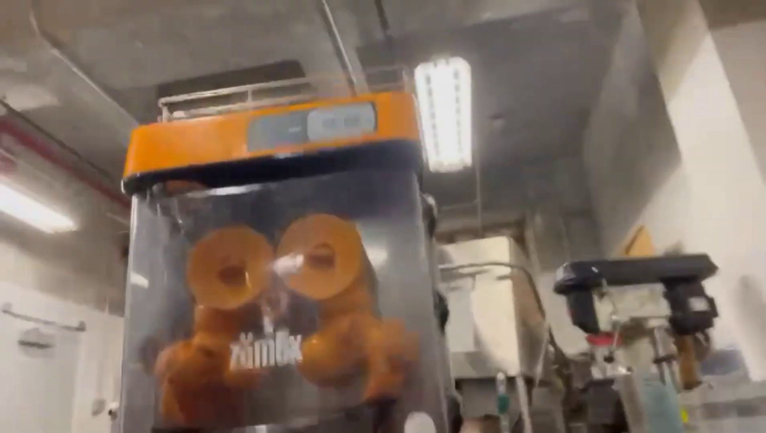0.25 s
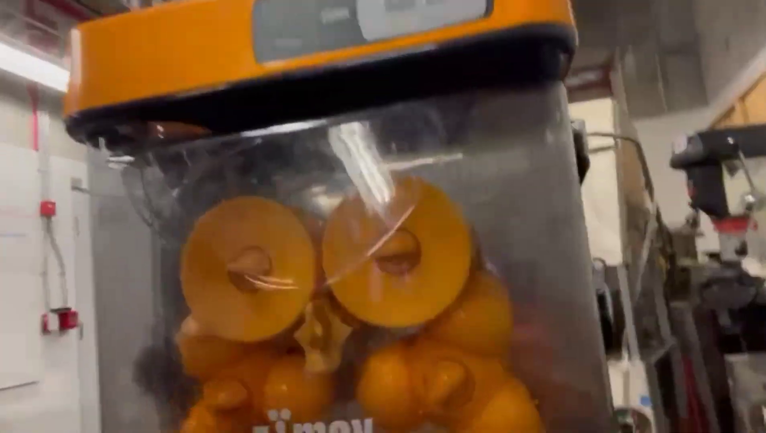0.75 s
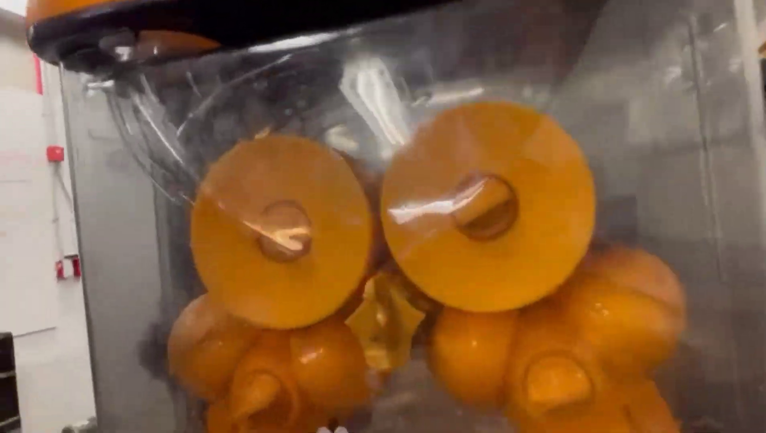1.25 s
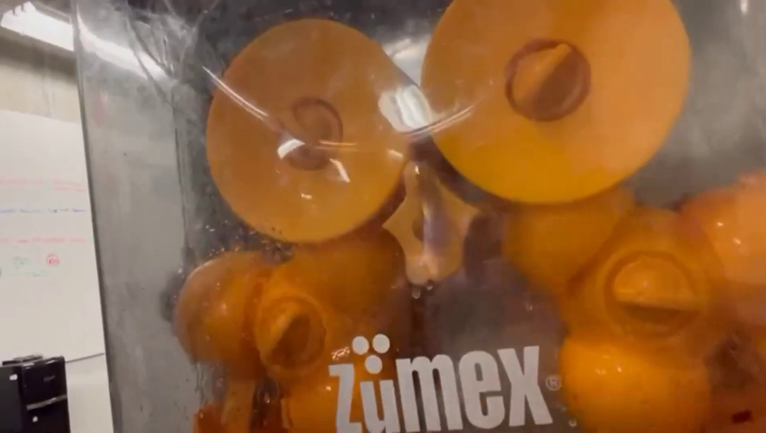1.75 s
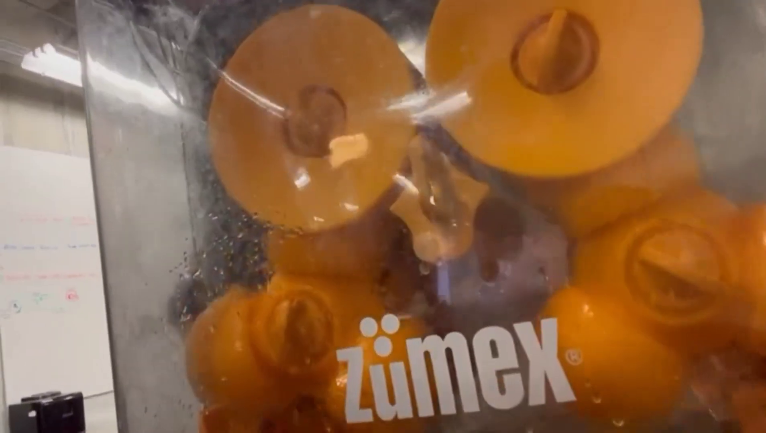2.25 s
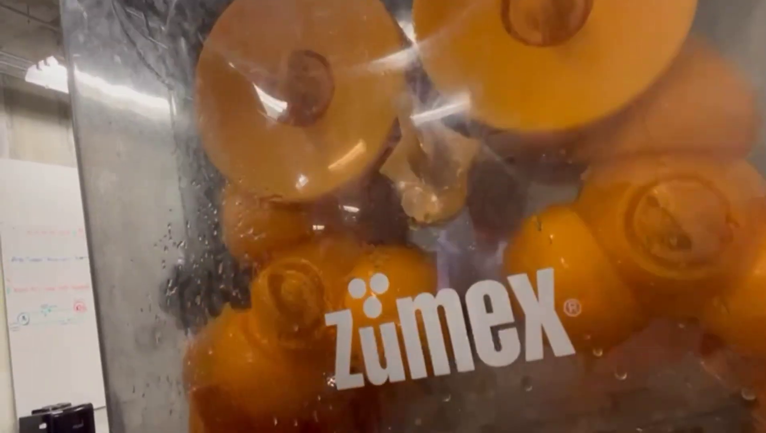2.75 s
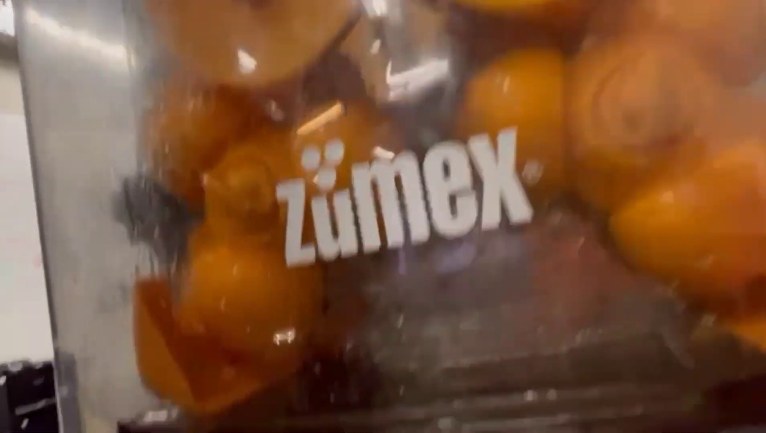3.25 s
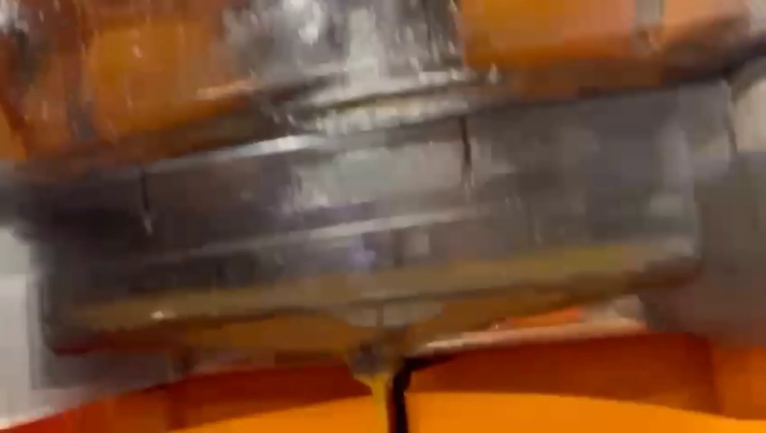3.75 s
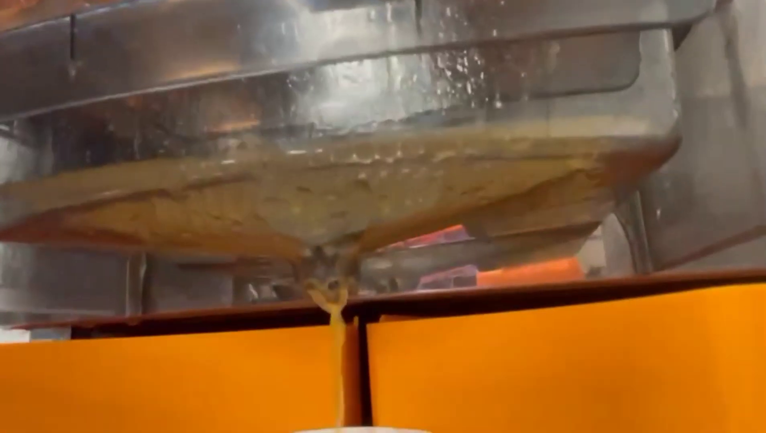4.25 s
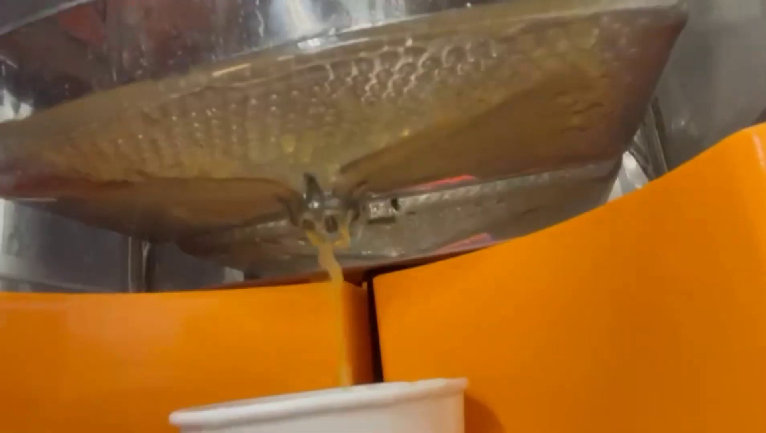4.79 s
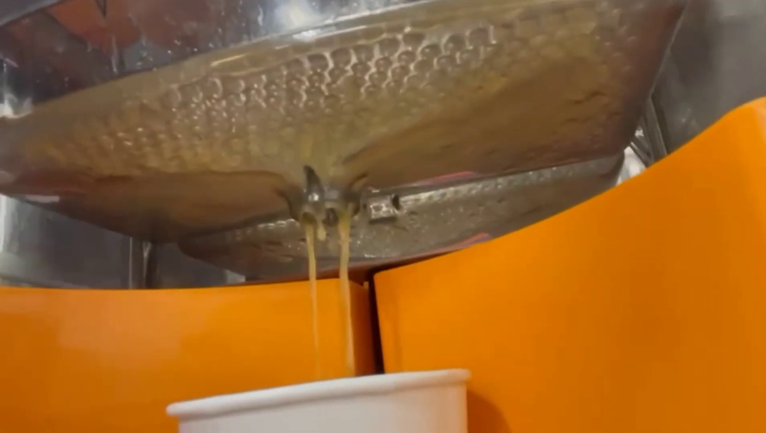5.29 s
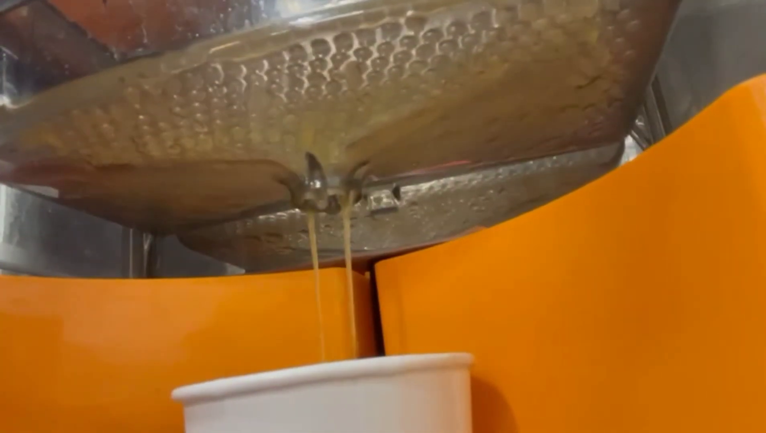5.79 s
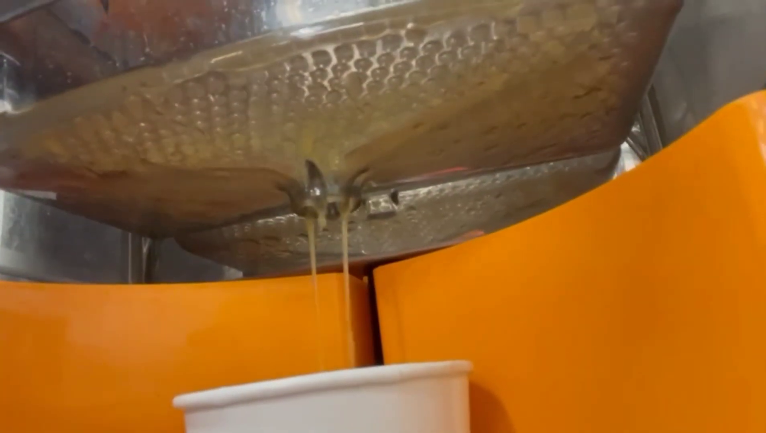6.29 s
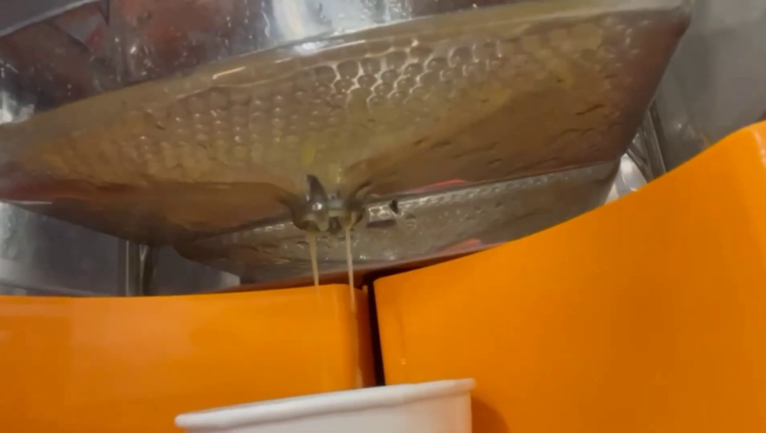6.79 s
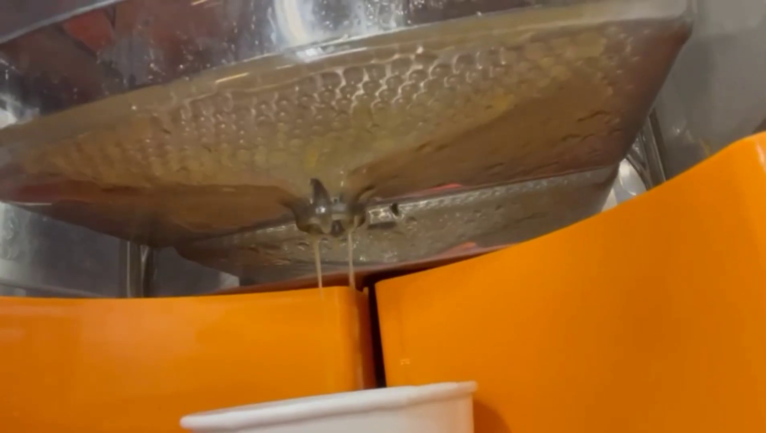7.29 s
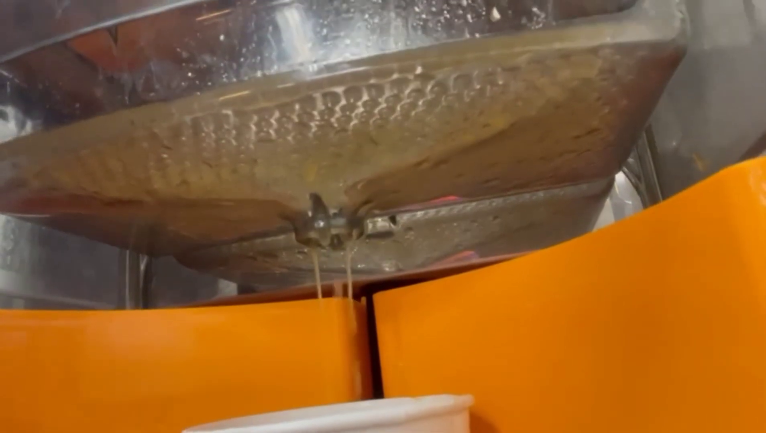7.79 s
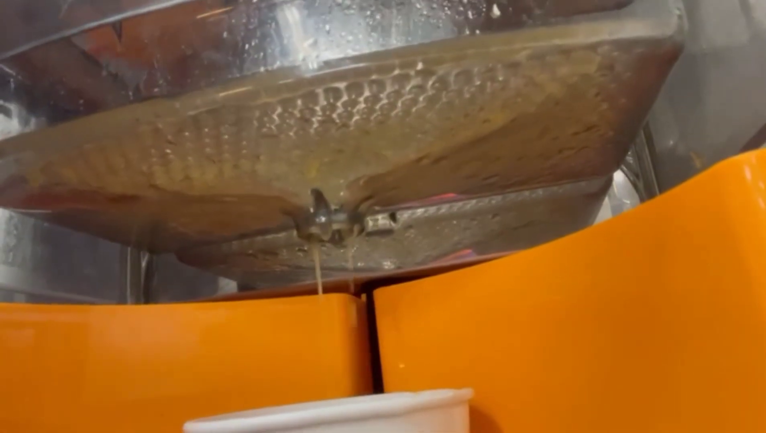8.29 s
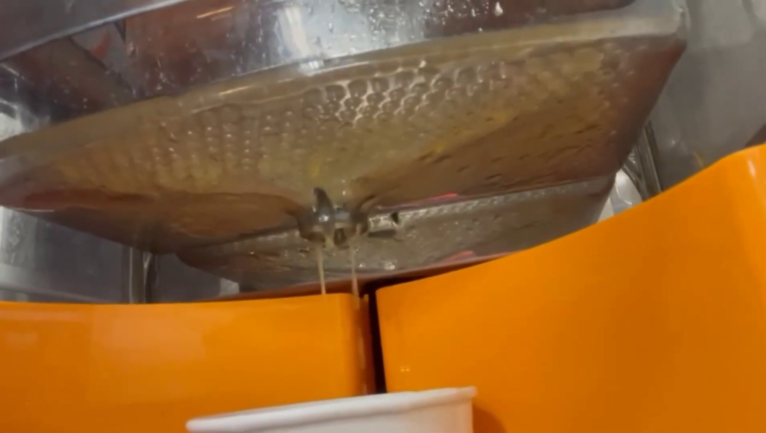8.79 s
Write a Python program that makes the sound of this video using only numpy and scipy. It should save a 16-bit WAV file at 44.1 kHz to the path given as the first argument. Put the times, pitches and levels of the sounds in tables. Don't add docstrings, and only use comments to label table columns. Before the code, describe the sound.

An automatic juicer runs without pause in a hard-walled workshop. A nearly pure low motor hum dominates, with steady gear tones, fluttering bearing whine, rumble and airy hiss around it. The handheld stereo microphone walks in, lingers close, then sinks lower, where the hum strengthens and the tone color shifts. Past the middle, a peel thuds hollowly into a bin, followed at once by a tiny high drip plink.

```python
import sys
import numpy as np
from scipy import signal
from scipy.fft import rfft, irfft, next_fast_len
from scipy.io import wavfile
from scipy.ndimage import uniform_filter1d, map_coordinates

SR = 44100
rng = np.random.default_rng(int(sys.argv[2]) if len(sys.argv) > 2 else 0)


def amp(db):
    return 10 ** (np.asarray(db, float) / 20)


def write(x):
    x = np.atleast_2d(x).T
    wavfile.write(sys.argv[1], SR, np.round(np.clip(x, -1, 1) * 32767).astype(np.int16))


N = 398663
LONG = next_fast_len(N + SR // 2)
KNOTS = 512
KNOT_S = np.arange(KNOTS) * LONG / SR / KNOTS
BALL_HZ, SHAFT_HZ = 319.39, 59.08


def unit(x):
    return x / np.sqrt(np.mean(np.abs(x) ** 2) + 1e-20)


def along(points, hz):
    f, v = np.transpose(points)
    return np.interp(np.log(hz + 1), np.log(f + 1), v)


def curves(rows, x):
    first, *cols = np.transpose(rows)
    return [np.interp(x, first, c) for c in cols]


def wobble(rate, t):
    return map_coordinates(rng.standard_normal(400), [t * rate])


def panned(x, pan_db):
    return x * amp(np.array([pan_db / 2, -pan_db / 2]))


def place(t):
    # t/s, place (0 afar, 1 striding, 2 arriving, 3 window, 4 sinking, 5 tray, 6 settled)
    way = [(0, 0), (.27, 0.1), (.4, 1), (.92, 1), (1.15, 2), (1.85, 2), (2.15, 3), (3.3, 3), (3.7, 4),
           (4.2, 4), (4.65, 5), (6.3, 5), (7.2, 6), (9.04, 6)]
    return curves(way, t)[0]


def nearness(k, t):
    return np.clip(1 - np.abs(place(t) - k), 0, 1)


def low_down(t):
    return np.clip((place(t) - 3) / 2, 0, 1)


def travelled(hz, heard):
    near = nearness(np.arange(len(heard))[:, None], KNOT_S)
    left_db, right_db, lead = np.transpose(heard, (2, 1, 0))
    return zip(hz, left_db @ near, right_db @ near, np.angle(np.exp(1j * lead) @ near))


def tones(table, gain, wander_db, rate, rough):
    t = KNOT_S
    spectrum = np.zeros((2, LONG // 2 + 1), complex)
    offsets = np.fft.fftfreq(KNOTS, 1 / KNOTS).astype(int)
    sooner_s = 0.7 * np.clip(t, 0.15, 0.65) / 343
    for hz, left_db, right_db, lead in table:
        flutter = rough * (wobble(17, t) + 1j * wobble(17, t))
        turns = rng.random() + hz * sooner_s
        common = gain(t) * (1 + flutter) * np.exp(2j * np.pi * turns + 0.5j * wobble(rate, t))
        for port, (db, turn) in enumerate([(left_db, lead), (right_db, 0)]):
            swell = amp(db + wander_db * wobble(rate, t)) * np.exp(1j * turn)
            line = np.fft.fft(common * swell) * LONG / KNOTS / np.sqrt(2)
            spectrum[port, round(hz * LONG / SR) + offsets] += line
    return irfft(spectrum, LONG)[:, :N]


def rush(mid, side, lean, band, patchy_db):
    z = signal.stft(rng.standard_normal((2, N + SR // 2)), nperseg=512)[2]
    field = uniform_filter1d(rng.standard_normal(z.shape[1:]), size=5, axis=0)
    field = uniform_filter1d(field, size=12, axis=1)
    pair = unit(signal.istft(z * amp(patchy_db * unit(field)), nperseg=512)[1])
    hz = np.fft.rfftfreq(LONG, 1 / SR)
    a, b = rfft(pair, LONG)
    pull = np.clip(along(lean, hz), -0.95, 0.95)
    shared = a * amp(along(mid, hz))
    differing = (pull * a + np.sqrt(1 - pull ** 2) * b) * amp(along(side, hz))
    ports = np.array([shared + differing, shared - differing])
    return irfft(ports * band(hz) * np.sqrt(SR / 2), LONG)[:, :N]


def rings(table, glide, attack):
    out = np.zeros((2, N))
    t = np.arange(SR // 4) / SR
    for s, db, hz, t60, pan_db in table:
        tone = np.sin(2 * np.pi * hz * (t + glide * 50 * t ** 2))
        tone *= (1 - np.exp(-t / attack)) * amp(db - 60 * t / t60)
        out[:, round(s * SR):][:, :len(t)] += panned(tone, np.array([pan_db]))
    return out


def hum():
    # t/s, level/dB, left-right/dB
    hum_level = [(0.06, -25.5, -0.5), (0.48, -19.5, -0.5), (1.52, -16, -1.5), (1.67, -17.5, -1),
                 (2.09, -17, -1), (2.24, -18, -2.0), (2.36, -15.5, -2), (2.68, -16.5, -0.5),
                 (3.0, -16.5, -2.0), (4.71, -13.5, -2.0), (6.15, -13.5, -2), (7.78, -13.5, -2.0),
                 (8.08, -12.5, -1.5), (8.95, -13.5, -2.5)]
    t = np.arange(N) / SR
    db, pan_db = curves(hum_level, t)
    drift_rad = 0.36 * wobble(0.52, t) + 0.032 * wobble(7.2, t)
    tone = -np.sqrt(2) * np.sin(2 * np.pi * 119.9 * t + drift_rad)
    return panned(tone * amp(db + 0.27 * wobble(11, t)), pan_db)


def drone():
    drone_hz = [239.8, 446.8, 528, 543.5, 578.5, 709.2, 719.4, 813.1, 931.3, 1120, 1217, 1417.8, 1638,
                1685.5]
    # left/dB, right/dB, left lead/rad
    afar = [(-39.0, -39.0, 0.3), (-43.0, -40.0, -1.1), (-41.0, -46.0, 0.2), (-32.0, -36.0, 0.2),
            (-46.0, -43.0, -1.1), (-41.0, -26.0, 1.4), (-35.0, -38.0, -0.9), (-38.0, -33.0, -3.0),
            (-52.0, -53.0, -2.2), (-53.0, -52.0, 2.2), (-57.0, -50.0, 1.2), (-41.0, -43.0, 1.9),
            (-49.0, -55.0, 0.8), (-47.0, -56.0, 1.6)]
    striding = [(-39.0, -39.0, 0.3), (-39.0, -49.0, 1.6), (-43.0, -50.0, 2.0), (-54.0, -56.0, 0.1),
                (-43.0, -52.0, -2.3), (-36.0, -39.0, -1.5), (-39.0, -45.0, 2.8), (-42.0, -42.0, 2.3),
                (-54.0, -52.0, -1.2), (-57.0, -54.0, -0.1), (-51.0, -49.0, -0.2), (-44.0, -46.0, -3.1),
                (-49.0, -56.0, 2.7), (-49.0, -57.0, 0.2)]
    arriving = [(-38.0, -37.0, 0.1), (-50.0, -59.0, -2.3), (-50.0, -54.0, -1.3), (-48.0, -48.0, -0.7),
                (-40.0, -41.0, 2.0), (-42.0, -44.0, 0.0), (-36.0, -46.0, 2.0), (-43.0, -40.0, -1.6),
                (-51.0, -52.0, 0.5), (-57.0, -52.0, 2.1), (-42.0, -48.0, -0.3), (-43.0, -42.0, 0.8),
                (-49.0, -53.0, -3.0), (-52.0, -53.0, -0.7)]
    window = [(-36.0, -37.0, 0.0), (-48.0, -50.0, -2.8), (-46.0, -47.0, -2.8), (-43.0, -43.0, -0.7),
              (-39.0, -38.0, 2.0), (-51.0, -48.0, -1.4), (-38.0, -47.0, 1.2), (-42.0, -46.0, -1.0),
              (-46.0, -54.0, 0.3), (-49.0, -52.0, 0.4), (-48.0, -52.0, 3.1), (-45.0, -53.0, 2.1),
              (-47.0, -54.0, 2.9), (-53.0, -53.0, 2.8)]
    sinking = [(-36.0, -36.0, -0.0), (-48.0, -49.0, -0.0), (-46.0, -46.0, 1.3), (-40.0, -42.0, 2.6),
               (-47.0, -41.0, -2.1), (-42.0, -38.0, -2.2), (-37.0, -42.0, -2.0), (-49.0, -54.0, 2.6),
               (-53.0, -55.0, -0.6), (-48.0, -53.0, -2.0), (-53.0, -51.0, 1.0), (-43.0, -43.0, 2.4),
               (-46.0, -56.0, -2.7), (-47.0, -53.0, -2.8)]
    tray = [(-35.0, -36.0, -0.2), (-38.0, -41.0, -0.1), (-44.0, -40.0, 1.5), (-38.0, -34.0, 1.9),
            (-39.0, -39.0, 3.0), (-40.0, -39.0, 3.0), (-41.0, -41.0, -3.0), (-50.0, -55.0, -1.6),
            (-55.0, -56.0, -0.5), (-58.0, -57.0, -0.2), (-52.0, -55.0, -1.2), (-41.0, -48.0, 2.6),
            (-47.0, -50.0, 0.4), (-48.0, -56.0, 0.4)]
    settled = [(-36.0, -35.0, -0.1), (-43.0, -45.0, -0.3), (-42.0, -39.0, 1.2), (-37.0, -33.0, 1.9),
               (-39.0, -38.0, -3.1), (-42.0, -40.0, 3.0), (-42.0, -42.0, -2.8), (-49.0, -55.0, -0.3),
               (-57.0, -57.0, -0.1), (-54.0, -55.0, 2.9), (-55.0, -53.0, -0.8), (-40.0, -45.0, 2.9),
               (-47.0, -58.0, -0.4), (-46.0, -54.0, 0.7)]
    # f/Hz,
    # left/dB, right/dB, left lead/rad
    frame_all = [(49, -41, -44.5, 0), (84.2, -42, -43.5, 0.1), (144.7, -40, -38.5, -0.5),
                 (212.3, -52, -44.5, 1), (258.2, -44.5, -48, 1), (1051, -50, -46, -2.5),
                 (1309, -45, -50.5, 0.8)]
    frame_tray = [(431, -50, -47.5, 0.5), (470, -39.5, -42.5, 1.5), (492.6, -42.5, -43.5, 1.4),
                  (554.6, -44.5, -42, 1), (590, -47.5, -46.5, 2.3), (618, -53, -53, 3),
                  (1067, -50.5, -49, 1.1), (1150, -46.5, -49.5, 3), (1287, -52.5, -52, 0.4),
                  (1322, -52, -54, -0.5), (1338, -51.5, -52, 1.1), (1480, -52, -49, 2),
                  (1661, -49, -50, 2.2), (1735, -53.5, -55, 1.5)]
    rows = travelled(drone_hz, [afar, striding, arriving, window, sinking, tray, settled])
    lines = amp(-0.1) * tones(rows, np.ones_like, wander_db=1.56, rate=1.593, rough=0.16)
    frame = tones(frame_all, np.ones_like, wander_db=2.5, rate=1.497, rough=0.36)
    frame += tones(frame_tray, low_down, wander_db=2.0, rate=3.5, rough=0.45)
    return lines + frame


def panels():
    # f/Hz, left/dB, right/dB, left lead/rad
    boom_afar = [(531, -35, -36, .2), (549, -31, -33, .1), (703, -35, -36, .3), (722, -37, -38, 0)]
    boom_striding = [(592, -38, -39, .3), (612, -43, -44, 0), (695, -42, -43, 0), (835, -47, -47, 0)]
    mirrored = [(4093, -44, -49, .5), (4211, -41, -46, .5)]

    def passing(t):
        return np.exp(-((t - 0.43) / 0.06) ** 2)

    glint = tones(mirrored, passing, wander_db=0, rate=1, rough=0.05)
    far = tones(boom_afar, lambda t: nearness(0, t), wander_db=1, rate=4, rough=0.35)
    stride = tones(boom_striding, lambda t: nearness(1, t), wander_db=1.5, rate=3, rough=0.4)
    return glint + far + stride


def whine():
    # ball overtone, shaft sideband, level/dB
    strong = [(12, -1, -50.1), (14, -11, -51.9), (12, 1, -48.7), (14, -9, -53.3), (14, -7, -52.8),
              (13, -1, -45.0), (13, 0, -49.1), (14, -5, -50.1), (13, 1, -41.5), (14, -1, -52.0),
              (14, 1, -48.0), (15, -1, -55.7), (15, 1, -46.8), (16, 1, -52.3), (17, -1, -49.2),
              (17, 1, -47.7), (18, 1, -55.6), (19, 1, -51.9), (19, 2, -57.3), (20, -1, -54.2),
              (20, 1, -51.1), (21, -1, -55.9), (22, 2, -60.2), (24, 2, -57.4), (25, -2, -55.7),
              (25, 2, -50.5), (26, 2, -50.8), (27, 2, -51.8), (28, 2, -55.7), (29, 2, -59.3)]
    faint = [(7, 1, -55), (9, -1, -59), (9, 1, -58), (10, -1, -58), (10, 1, -58), (11, 1, -59),
             (12, 3, -57), (13, -5, -57), (12, 5, -56), (14, 2, -58), (20, 2, -60), (27, -2, -61),
             (30, 0, -64), (30, 2, -67), (25, 1, -60), (28, -1, -63)]
    # f/Hz, left/dB, right/dB, left lead/rad
    afar = [(2300.0, -3.0, -5.0, 1.5), (3850.0, -1.0, 0.0, 2.0), (4170.0, -4.0, -11.0, 1.5),
            (4500.0, -4.0, -4.0, 0.8), (4830.0, -2.0, -6.0, 1.4), (5430.0, 2.0, -3.0, 1.8),
            (6400.0, -4.0, -2.0, 0.8), (8400.0, -7.0, -6.0, 0.4)]
    striding = [(2300.0, 3.0, -1.0, 0.4), (3850.0, -2.0, -6.0, 1.5), (4170.0, 1.0, -7.0, 1.6),
                (4500.0, -0.0, -1.0, 1.2), (4830.0, -6.0, -2.0, 1.4), (5430.0, -0.0, 0.0, 1.9),
                (6400.0, -7.0, -2.0, 0.8), (8400.0, -4.0, -4.0, 0.4)]
    arriving = [(2300.0, 5.0, -4.0, 0.9), (3850.0, 1.0, -1.0, 1.7), (4170.0, 3.0, -2.0, 1.2),
                (4500.0, 6.0, 2.0, 0.7), (4830.0, 7.0, 1.0, 1.5), (5430.0, -1.0, -0.0, 1.5),
                (6400.0, -1.0, -1.0, 0.5), (8400.0, -2.0, -2.0, 0.3)]
    window = [(2300.0, 1.0, -10.0, 1.4), (3850.0, 2.0, -3.0, 1.5), (4170.0, 3.0, -4.0, 1.6),
              (4500.0, 2.0, -3.0, 0.9), (4830.0, -1.0, -4.0, 1.8), (5430.0, -6.0, -2.0, 1.7),
              (6400.0, -1.0, 2.0, 0.6), (8400.0, -2.0, -2.0, 0.3)]
    sinking = [(2300.0, 1.0, -6.0, 2.2), (3850.0, 2.0, -3.0, 1.4), (4170.0, -3.0, -4.0, 1.7),
               (4500.0, -6.0, -8.0, 1.5), (4830.0, -8.0, -5.0, 2.1), (5430.0, 0.0, -4.0, 2.2),
               (6400.0, -5.0, -3.0, 1.2), (8400.0, 1.0, -0.0, 0.3)]
    tray = [(2300.0, 5.0, -9.0, 2.3), (3850.0, 1.0, -2.0, 1.4), (4170.0, 2.0, -4.0, 0.9),
            (4500.0, -1.0, 0.0, 2.8), (4830.0, -9.0, -1.0, 0.6), (5430.0, 3.0, 3.0, 1.0),
            (6400.0, -3.0, 0.0, 0.6), (8400.0, 3.0, 3.0, 0.2)]
    settled = [(2300.0, 3.0, -4.0, 2.4), (3850.0, 0.0, -3.0, 1.0), (4170.0, 2.0, -3.0, 0.8),
               (4500.0, -12.0, 1.0, 1.8), (4830.0, -5.0, -4.0, 0.5), (5430.0, 1.0, -1.0, 1.7),
               (6400.0, -5.0, 1.0, 1.0), (8400.0, 1.0, 0.0, 0.3)]
    overtone, sideband, db = np.transpose(strong + faint)
    hz = overtone * BALL_HZ + sideband * SHAFT_HZ
    heard = []
    for passage in [afar, striding, arriving, window, sinking, tray, settled]:
        left_db, right_db, lead = curves(passage, hz)
        lead += 0.25 * rng.standard_normal(len(hz)) * (hz < 5600)
        lead += 0.95 * np.clip(hz - 7550, 0, None) / 1000
        heard.append(np.transpose([db + left_db, db + right_db, lead]))
    return amp(0.4) * tones(travelled(hz, heard), np.ones_like, wander_db=2.8, rate=2.2, rough=0.07)


def casing():
    # f/Hz, level/dB per Hz
    rumble_window = [(26, -77), (64, -55), (139, -55.5), (172, -57), (339, -58.5), (387, -63), (586, -57.5),
                     (629, -64.5), (672, -65), (715, -58.5), (785, -65), (823, -65), (877, -66.5),
                     (995, -69.5)]
    rumble_window_side = [(26, -86), (123, -57.5), (188, -69.5), (322, -65.5), (403, -61.5), (565, -55.5),
                          (581, -56.5), (602, -63), (662, -63), (710, -57.5), (780, -61.5), (818, -63.5),
                          (888, -74.5), (995, -64.5)]
    rumble_tray = [(26, -64.5), (43, -56.5), (145, -51), (177, -54.5), (247, -52), (328, -58), (414, -57.5),
                   (538, -53.5), (662, -76.5), (710, -66.5), (753, -74), (823, -65.5), (915, -69),
                   (995, -62.5)]
    rumble_tray_side = [(26, -78), (102, -57.5), (139, -58.5), (183, -76), (247, -62), (301, -59),
                        (398, -62), (543, -51), (629, -63.5), (683, -62.5), (715, -61), (740, -64.5),
                        (780, -68), (995, -71)]
    hiss_window = [(1001, -63), (3482, -76), (4155, -71), (4333, -75), (4495, -73), (4984, -75.5),
                   (5905, -76.5), (6449, -73.5), (6879, -81), (8107, -72), (8769, -77.5), (9183, -80.5),
                   (9700, -81), (9899, -92)]
    hiss_window_side = [(1001, -66.5), (1335, -64.5), (3482, -78.5), (4166, -69), (4984, -73), (5490, -81),
                        (6459, -76), (6761, -85), (7735, -83.5), (8139, -81.5), (8618, -93.5),
                        (8753, -84.5), (9426, -74.5), (9899, -86)]
    hiss_tray = [(1001, -66.5), (1318, -66), (2110, -73.5), (3509, -76), (4145, -71.5), (4700, -80),
                 (5000, -79), (5400, -74), (5850, -79.5), (6250, -76), (6890, -79.5), (8300, -73.5),
                 (9550, -83.5), (9899, -92)]
    hiss_tray_side = [(1001, -69), (1335, -67), (2713, -76), (4107, -71.5), (4656, -83.5), (5485, -72),
                      (5932, -84.5), (6443, -76.5), (6659, -97), (7703, -93.0), (7816, -84), (8441, -84),
                      (8914, -81.5), (9899, -81)]
    # f/Hz, pull to the left (-1..1)
    lean_window = [(60, -.2), (190, 0), (400, 0.22), (1000, .15), (1800, 0.4), (5500, 0.41), (8000, 0.16)]
    lean_tray = [(60, -.2), (190, -.1), (330, .1), (570, -0.21), (1000, 0.3), (3000, 0.2), (5500, -0.033),
                 (8000, 0.047)]
    # place, rumble/dB, hiss/dB
    louder = [(0, -0.5, -2), (1, -1.7, -0.5), (2, 0, -0.1), (3, 0.7, 0.26), (4, -1, 0), (5, -0.5, 0),
              (6, -5, -.6)]
    split_hz = 1000

    def low(hz):
        return hz < split_hz

    def high(hz):
        gaps_db = 2 - 6.5 * np.sin(np.pi * hz / BALL_HZ) ** 6
        gaps = amp(gaps_db * (hz > 4600) * (hz < 6700))
        return gaps * (hz >= split_hz) * (hz < 10400)

    t = np.arange(N) / SR
    rumble_db, hiss_db = curves(louder, place(t))
    at_tray = np.sqrt(low_down(t))
    at_window = np.sqrt(1 - low_down(t))
    rumble = at_window * rush(rumble_window, rumble_window_side, lean_window, low, patchy_db=1.5)
    rumble += at_tray * rush(rumble_tray, rumble_tray_side, lean_tray, low, patchy_db=2.0)
    hiss = at_window * rush(hiss_window, hiss_window_side, lean_window, high, patchy_db=1.83)
    hiss += at_tray * rush(hiss_tray, hiss_tray_side, lean_tray, high, patchy_db=1.54)
    shaft = amp(0.12 * np.sin(2 * np.pi * SHAFT_HZ * t))
    return amp(rumble_db) * rumble + amp(hiss_db) * shaft * hiss


def peel():
    # t/s, peak level/dB, f/Hz, 60 dB decay/s, left-right/dB
    bin_modes = [
        (5.4728, -16, 540, .045, -2),
        (5.4768, -12, 335, .1, -1.5),
        (5.476, -19.5, 800, .025, -3),
        (5.476, -27, 1600, .02, -5),
        (5.477, -27, 5200, .025, -8),
    ]
    return rings(bin_modes, glide=-0.017, attack=0.00035)


def drip():
    # t/s, peak level/dB, start f/Hz, 60 dB decay/s, left-right/dB
    bubbles = [
        (5.5745, -11, 2900, 0.021, -8),
    ]
    return rings(bubbles, glide=0.063, attack=0.0029)


def scene():
    return hum() + drone() + panels() + whine() + casing() + peel() + drip()


def thrifty(dry):
    # f/Hz, level/dB
    masked = [(250, -30), (720, -11.3), (880, -15), (1500, -9), (2300, -5), (3300, -3.6), (4100, -8),
              (4500, -5), (5000, -3.2), (6000, -4), (7000, -4.5), (8000, -5), (9300, -2.5)]
    hz, _, z = signal.stft([dry[0] + dry[1], dry[0] - dry[1]], SR, nperseg=2048)
    power = np.abs(z) ** 2
    around = uniform_filter1d(power.mean(axis=0), size=37, axis=0)
    around = uniform_filter1d(around, size=5, axis=1)
    here = uniform_filter1d(uniform_filter1d(power, size=4, axis=1), size=2, axis=2)
    z *= here > around * amp(2 * along(masked, hz))[:, None]
    z[1, (hz > 6750) & (hz < 7750)] = 0
    mid, side = signal.istft(z, SR, nperseg=2048)[1][:, :N] / 2
    return np.array([mid + side, mid - side])


def low_pass(x):
    return signal.sosfilt(signal.butter(12, 10210, fs=SR, output="sos"), x)


def record(dry):
    return low_pass(thrifty(dry))


dry = scene()
out = record(dry)
write(out)
```